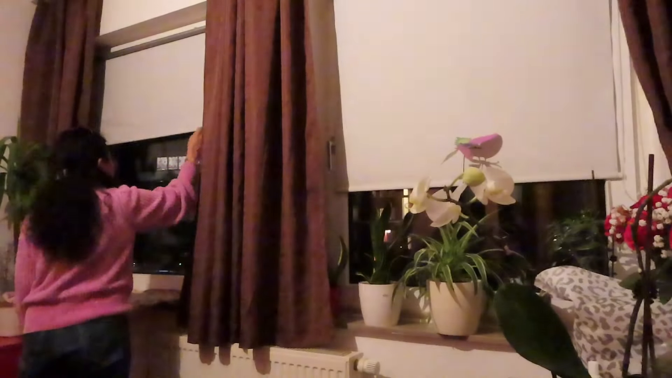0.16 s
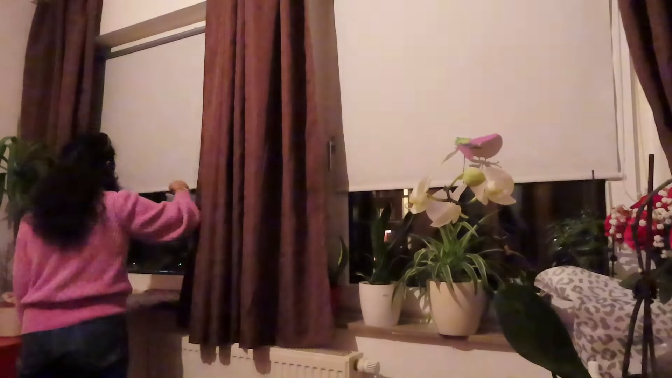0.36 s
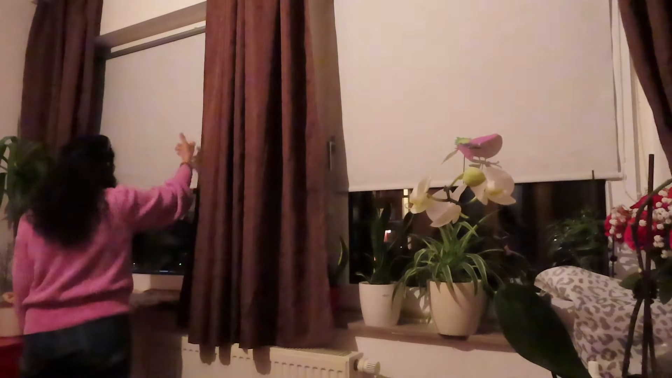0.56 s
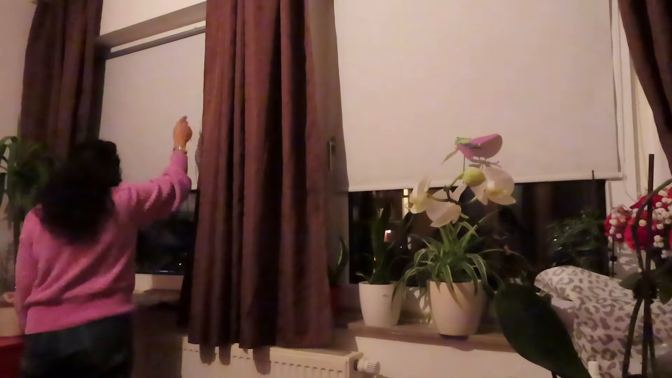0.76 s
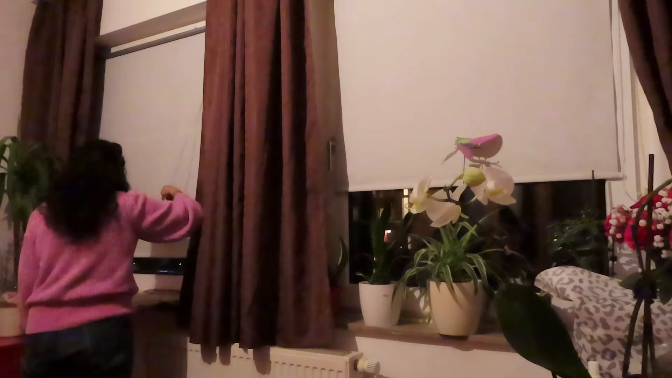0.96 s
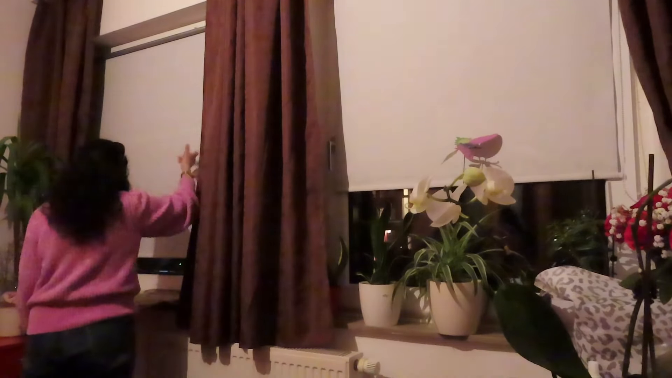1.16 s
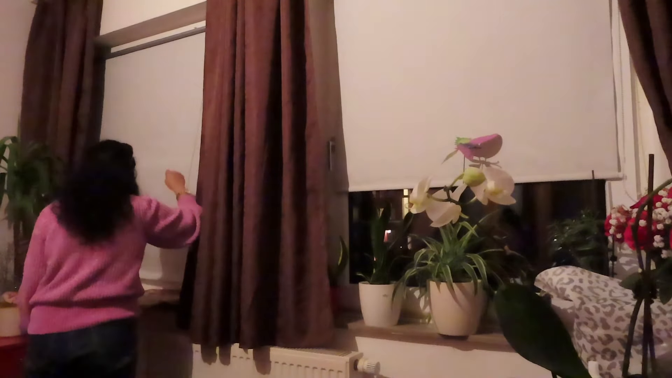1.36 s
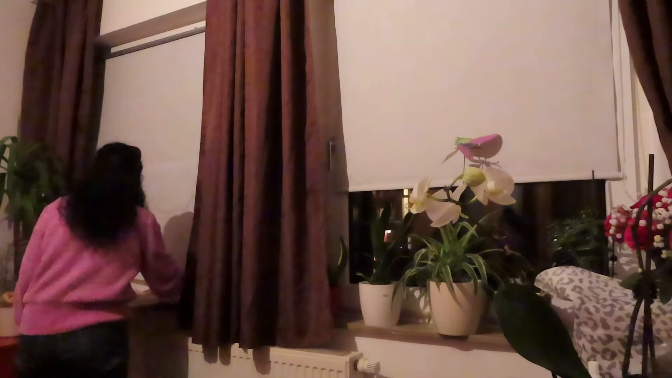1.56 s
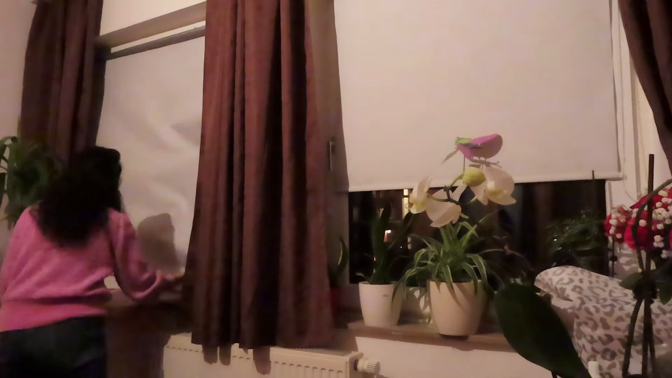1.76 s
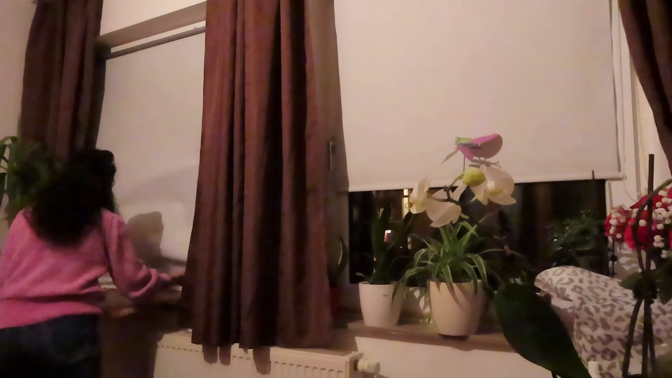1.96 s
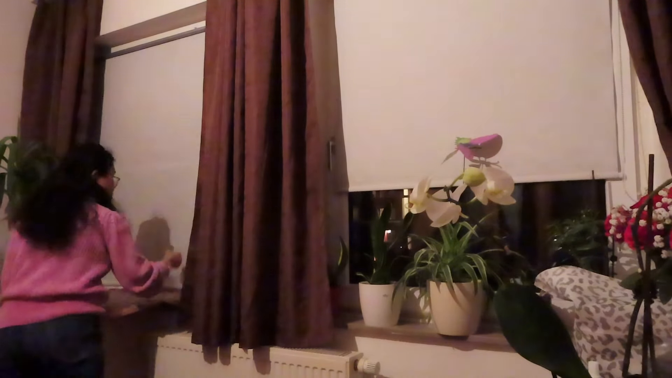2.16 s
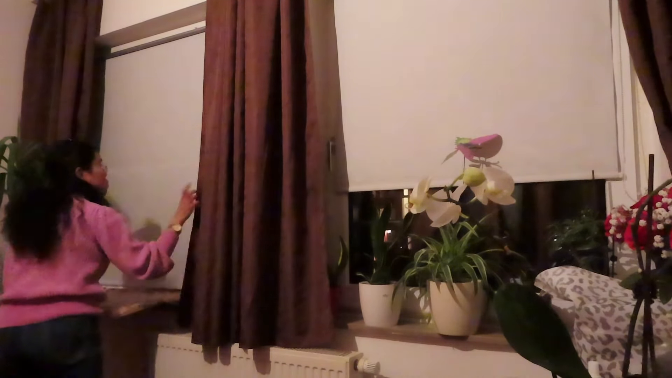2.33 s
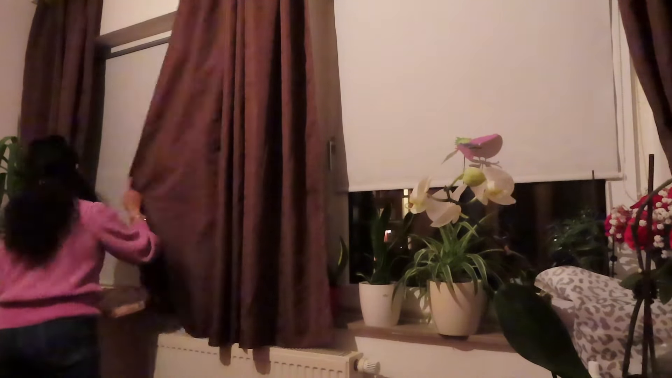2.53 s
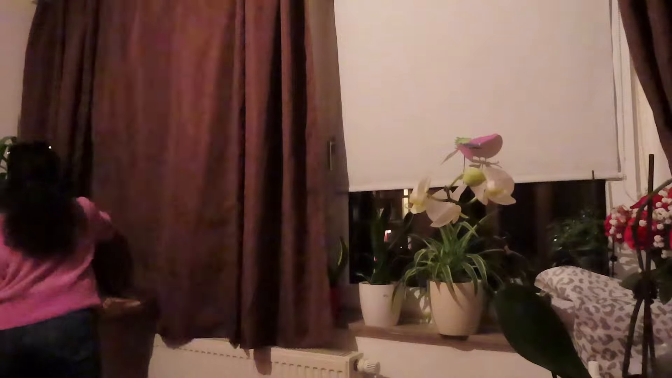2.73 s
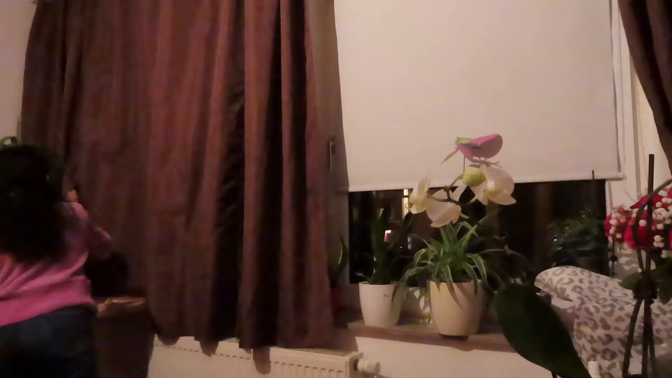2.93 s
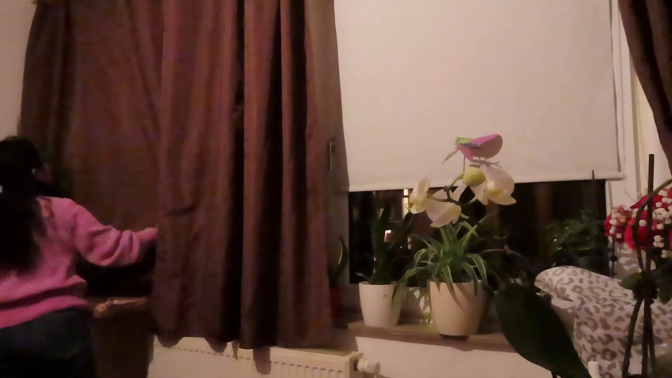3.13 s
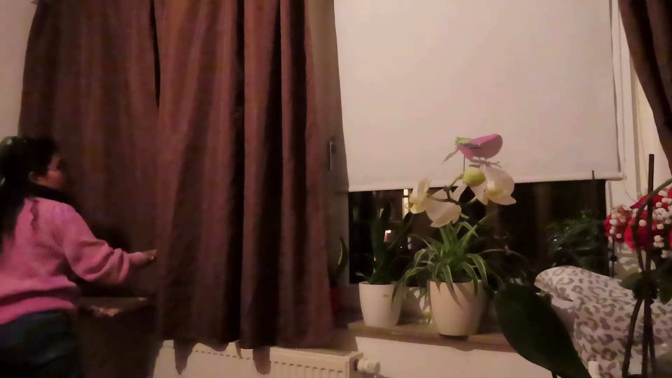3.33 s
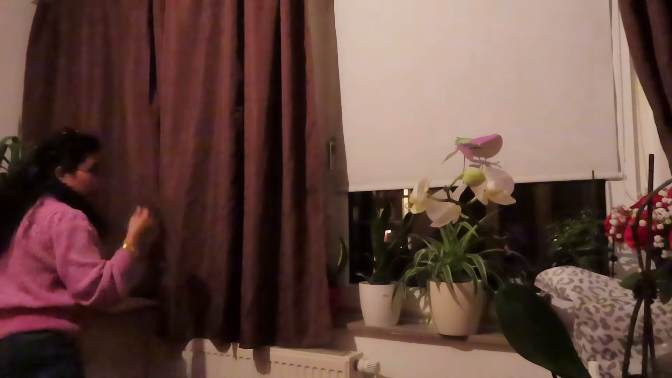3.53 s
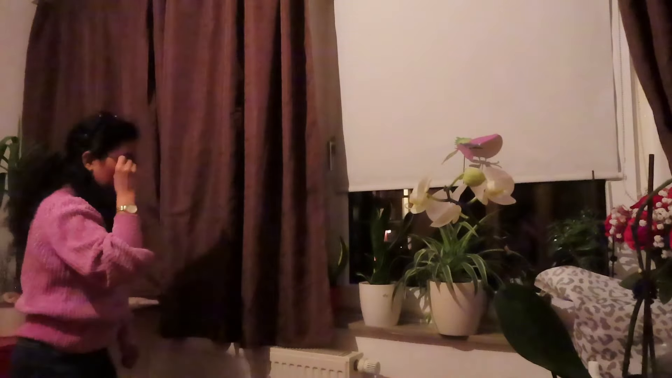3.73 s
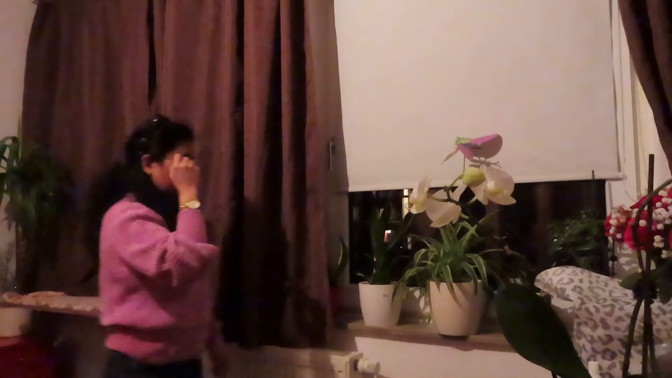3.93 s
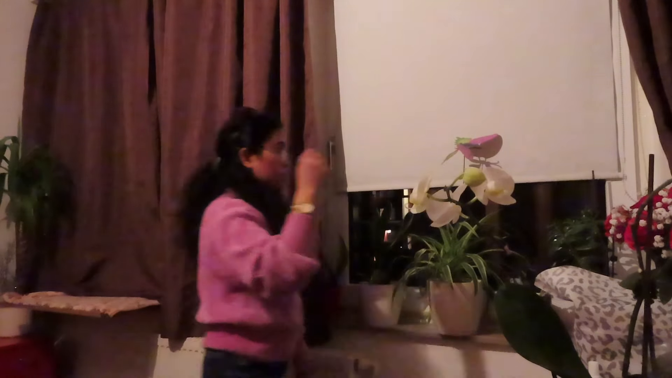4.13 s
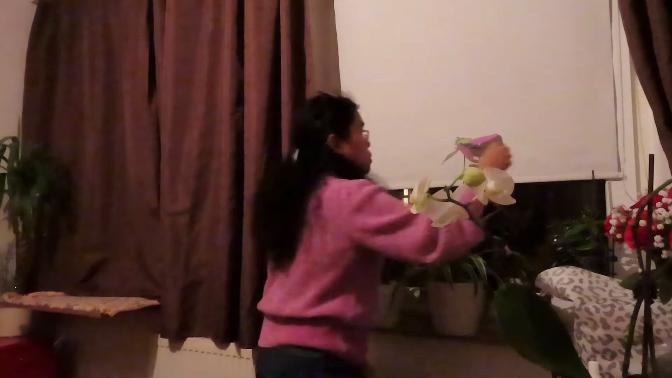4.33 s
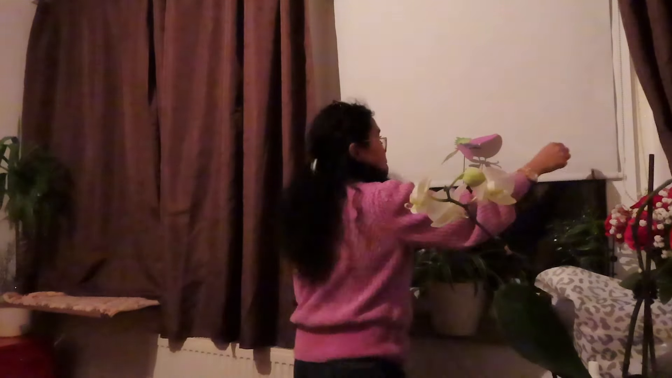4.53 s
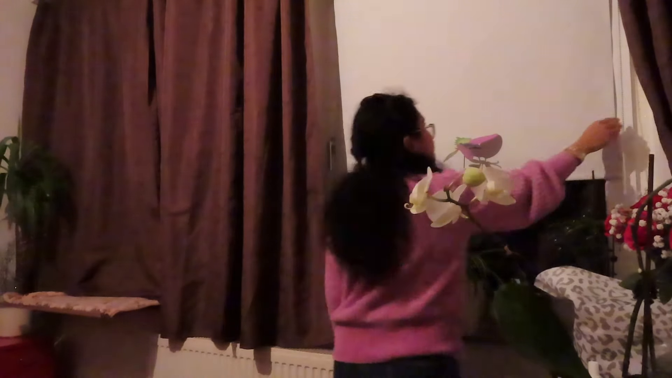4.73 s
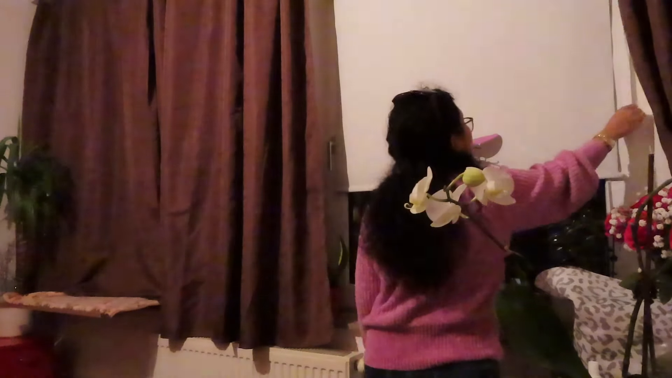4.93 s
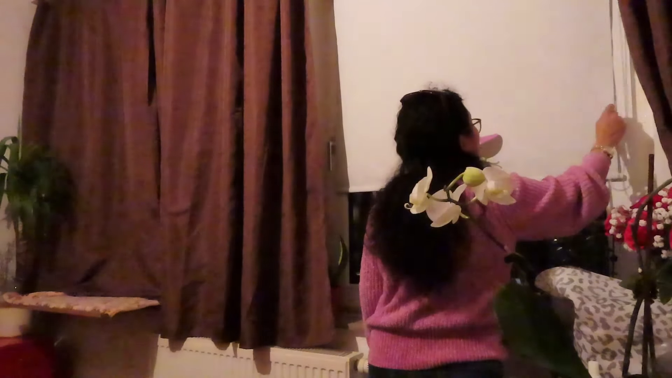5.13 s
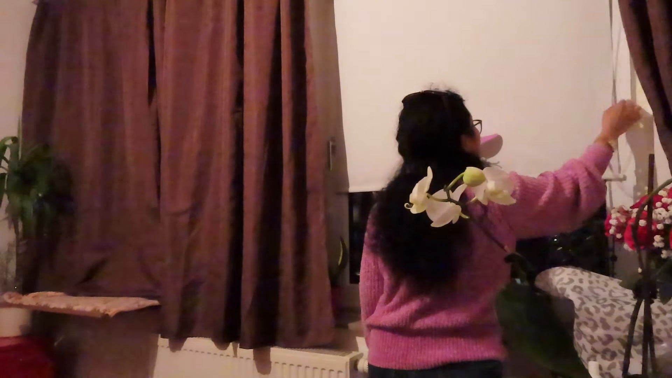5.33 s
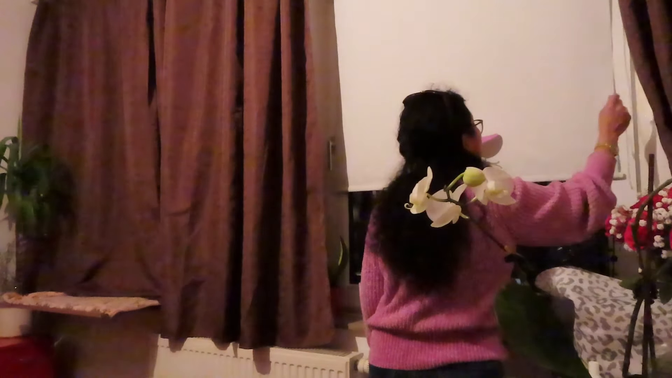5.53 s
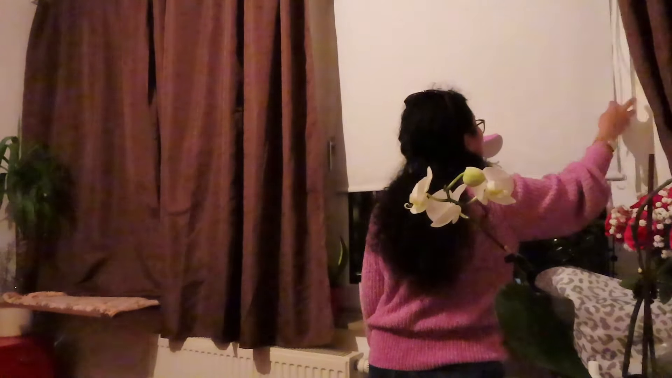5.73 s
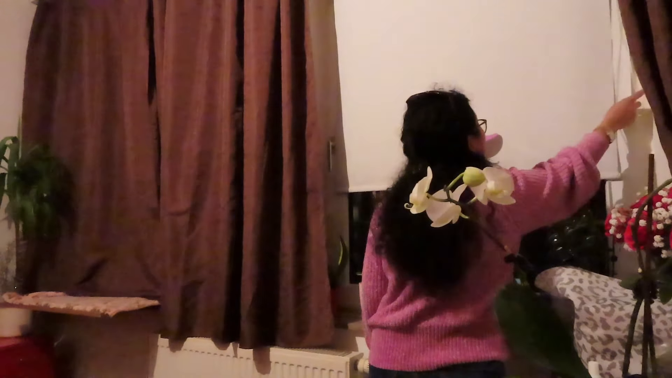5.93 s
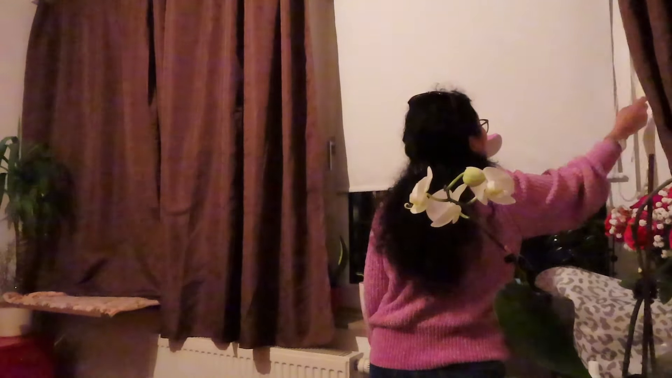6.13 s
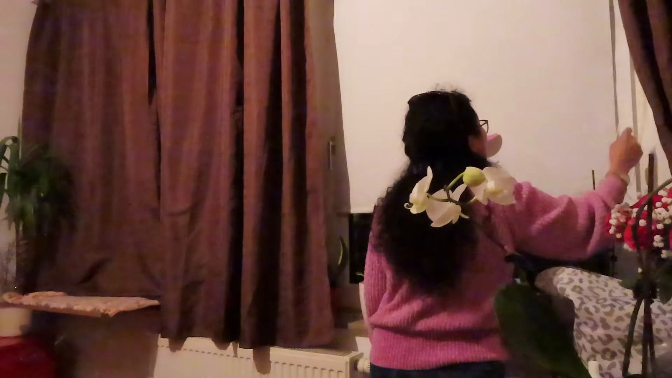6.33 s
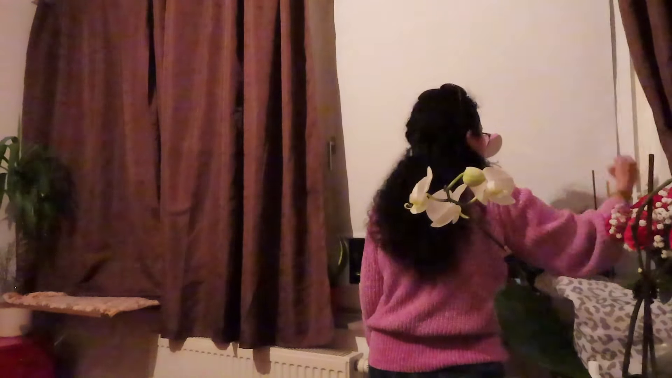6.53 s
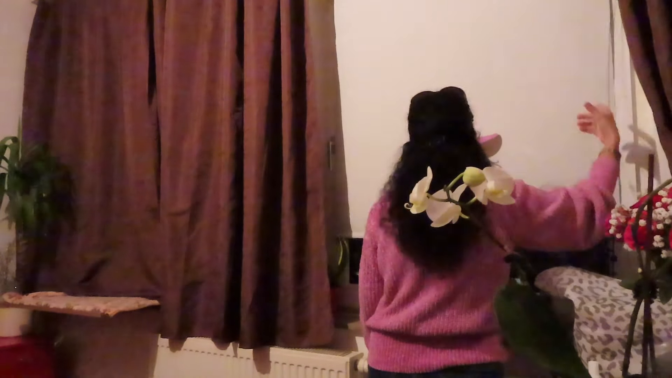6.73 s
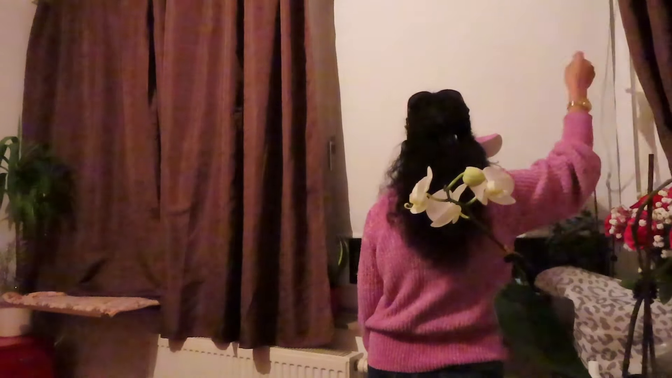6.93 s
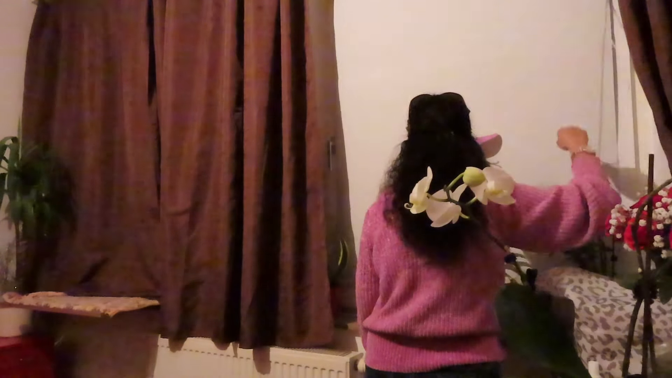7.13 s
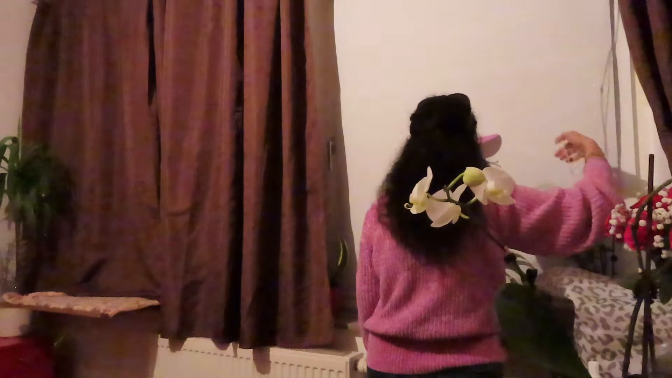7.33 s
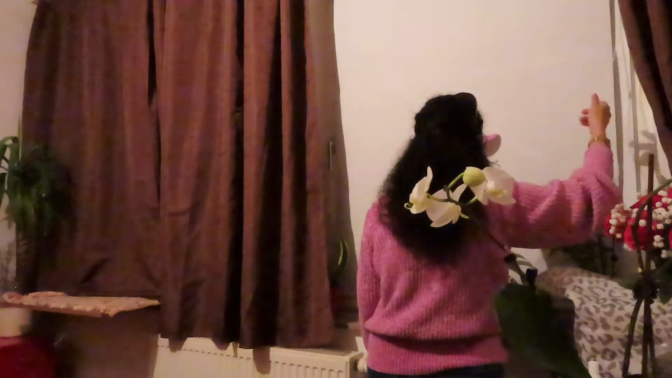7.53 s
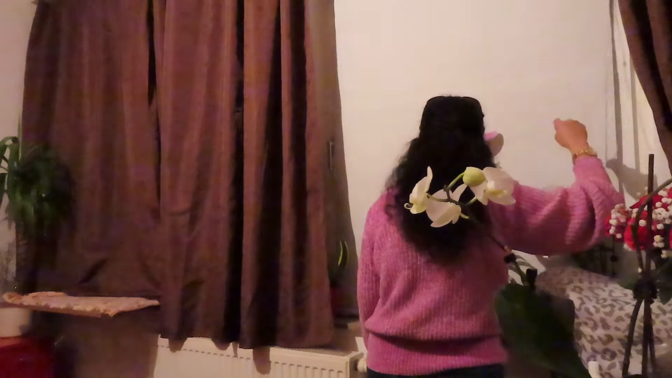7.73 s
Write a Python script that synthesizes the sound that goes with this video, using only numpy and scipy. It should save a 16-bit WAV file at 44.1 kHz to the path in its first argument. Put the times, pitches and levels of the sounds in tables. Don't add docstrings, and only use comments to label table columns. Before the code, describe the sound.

Quiet living room, soft steady hiss, short damped reflections, microphone a few metres off. At left, a bead chain rattles grittily over its sprocket at 0.2-0.4 s and again at 0.8-1.0, ringing the tube. A clattering tap comes at 1.24, a third softer pull with a dry snap at 1.37, chain clatter at 1.6-1.8, then the bottom bar lands with the sharpest clack at 1.81, tiny bounces and cloth rustle. From 2.54 to 2.9 curtain hooks scrape brightly along a rail; a second burst peaks near 3.15, rumbling lower. Near silence with faint steps follows until a deep, loud heel thump at 4.66. At right, light ticks run from 5.1 to 6.1, with a tiny creak at 5.56. Sparse chain tugs at 6.25-6.5 bring thin 12 kHz squeaks; a longer pull at 7.0-7.3 adds chirps and thuds, and quick tugs with a hard knock and squeak end it at 7.65-7.8.

```python
import sys
import numpy as np
from scipy import signal
from scipy.fft import rfft, irfft, next_fast_len
from scipy.io import wavfile
from scipy.ndimage import uniform_filter1d

SR = 44100
rng = np.random.default_rng(int(sys.argv[2]) if len(sys.argv) > 2 else 0)


def dump(signal):
    limited = np.clip(np.atleast_2d(signal).T, -1, 1)
    pcm = np.round(limited * 32767).astype(np.int16)
    wavfile.write(sys.argv[1], SR, pcm)


def convert_level_to_amplitude(level_db):
    exponent = np.asarray(level_db, float) / 20
    return 10 ** exponent


N = 343098
SIZE = next_fast_len(N)
HZ = np.fft.rfftfreq(SIZE, 1 / SR)


def evened(x):
    return x / np.sqrt(np.mean(x ** 2) + 1e-20)


def read(points, hz):
    f, value = np.transpose(points)
    return np.interp(np.log(hz + 1), np.log(f + 1), value)


def add(mix, s, sound):
    part = mix[round(s * SR):][:len(sound)]
    part += sound[:len(part)]


def side_of(s):
    return 0 if s < 4 else 1


def colour(x, points):
    gain_db = np.maximum(read(points, abs(np.fft.fftfreq(4096, 1 / SR))), -90)
    log_gain = np.log(convert_level_to_amplitude(gain_db))
    taps = np.fft.ifft(np.exp(np.conj(signal.hilbert(log_gain)))).real[:2048]
    return signal.oaconvolve(x, taps)[:len(x)]


def band(x, lo_hz, hi_hz):
    sos = signal.butter(2, [lo_hz, min(hi_hz, 20000)], "band", fs=SR, output="sos")
    return signal.sosfilt(sos, x)


def drift(n, seconds):
    size = max(int(seconds * SR), 1)
    once = uniform_filter1d(rng.standard_normal(n), size)
    return evened(uniform_filter1d(once, size))


def patchy(x, patch_db, frames=5, bins=4, turn=0):
    z = signal.stft(x, nperseg=256)[2]
    over_time = uniform_filter1d(rng.standard_normal(z.shape[::-1]), frames, 0)
    field = evened(uniform_filter1d(over_time, bins, 1)).T
    return signal.istft(z * convert_level_to_amplitude(patch_db * field) * np.exp(1j * turn * field), nperseg=256)[1][:N]


def grit(per_s, spread_db, smooth, flutter_db, flutter_s):
    size = convert_level_to_amplitude(spread_db * np.minimum(rng.exponential(1, N), 5)) * rng.choice([-1., 1.], N)
    clicks = evened(size * (rng.random(N) < per_s / SR))
    return (clicks + smooth * rng.standard_normal(N)) * convert_level_to_amplitude(flutter_db * drift(N, flutter_s))


def pair(a, b, same, lead):
    likeness = np.clip(read(same, HZ), -1, 1)
    half_turn = np.exp(.5j * read(lead, HZ))
    shared = rfft(a, SIZE) * np.sqrt((1 + likeness) / 2)
    own = rfft(b, SIZE) * np.sqrt((1 - likeness) / 2)
    return irfft(np.array([(shared + own) * half_turn, (shared - own) / half_turn]), SIZE)[:, :N]


# pitch_hz, density_db (per Hz)
HISS_COLOUR = [(12, -42), (20, -44), (38, -4), (68, -2.5), (119, -2.5), (373, -4), (567, -12.5), (815, -9),
               (1200, -14), (1380, -15.5), (1830, -17), (2850, -21), (6970, -30), (12900, -41.5),
               (15600, -53)]
# pitch_hz, likeness (-1 to 1)
HISS_SAME = [(60, 1), (150, 0.54), (350, -0.5), (700, 0.056), (1500, 0.017), (3000, -0.00071), (9000, 0.77),
             (12000, 0.5), (14000, 0.6)]


def hiss():
    a, b = (evened(colour(v, HISS_COLOUR)) for v in rng.standard_normal((2, N)))
    level_db = -50.5 + 0.55 * drift(N, 0.025)
    return convert_level_to_amplitude(level_db) * pair(a, b, HISS_SAME, [(0, 0)])


# pitch_hz, t60_s
ROOM_DECAY = [(125, 0.42), (1000, 0.16), (4000, 0.12), (12000, 0.05)]


def in_room(x, same, lead, wet_db):
    taps = np.zeros((2, SR // 2))
    at = np.arange(100, SR // 2 - 20, 20) + rng.integers(0, 20, (2, (SR // 2 - 101) // 20))
    np.put_along_axis(taps, at, rng.choice([-1., 1.], at.shape), 1)
    hz, t, z = signal.stft(taps, SR, nperseg=256)
    tail = signal.istft(z * convert_level_to_amplitude(-60 * t / read(ROOM_DECAY, hz)[:, None]), SR, nperseg=256)[1]
    tail = tail / np.linalg.norm(tail[0])
    wet = convert_level_to_amplitude(wet_db) * signal.oaconvolve(x[None], tail, axes=1)[:, :N]
    scatter = patchy(x, 0, 14, 3, turn=2.6)
    return pair(x + wet[0], scatter + wet[1], same, lead)


# peak_s, half_length_s, level_db
RUSTLES = [(1.828, 0.073, -35), (1.995, 0.076, -48), (2.71, 0.22, -41), (3.102, 0.23, -43.5),
           (5.315, 0.2, -65), (6.389, 0.14, -47), (7.156, 0.061, -37), (7.779, 0.061, -46),
           (3.701, 0.69, -63), (5.526, .025, -52), (5.111, .04, -50), (5.236, .03, -52), (2.051, .05, -47),
           (3.601, .03, -54), (2.576, .03, -46), (3.04, .05, -44), (2.84, .035, -46), (3.36, .045, -49),
           (1.9, .03, -47)]
# pitch_hz, density_db (per Hz)
CLOTH = [(120, -41.5), (200, -7.5), (304, -3.5), (371, -14.5), (454, -5.5), (3070, -10), (9660, -27),
         (15500, -26.5)]


def rustle():
    t = np.arange(N) / SR
    moves = sum(convert_level_to_amplitude(db) * np.exp(-((t - s) / half) ** 2) for s, half, db in RUSTLES)
    return 0.54 * (convert_level_to_amplitude(-57) + moves) * evened(colour(grit(3000, 1.7, 1.0, 2.2, 0.021), CLOTH))


def struck(s, db, modes, push_s, rise):
    t = np.arange(9000) / SR
    ring = sum(convert_level_to_amplitude(d - 60 * t / t60) * np.cos(2 * np.pi * hz * t) for hz, d, t60 in modes)
    push = signal.windows.hann(round(push_s * SR) + 2)
    ring = np.convolve(ring * (1 - np.exp(-t / rise)) ** 2, push)
    return s, convert_level_to_amplitude(db) * ring / abs(ring).max()


# pitch_hz, level_db, t60_s
FLOORBOARD = [(300, -19, .04), (386, -13, .032), (520, -19, .054), (752, -26, .067)]
# pitch_hz, level_db, delay_s, length_s
JOIST = (158, -22.5, .022, .052)


def thump(s, db):
    t = np.arange(9000) / SR
    u = np.maximum(t - .002, 0) / .0078
    blow = np.cos(2 * np.pi * 143 * (t - .0082)) * (u * np.exp(1 - u)) ** 2
    hum = sum(convert_level_to_amplitude(d - 60 * t / t60) * np.sin(2 * np.pi * hz * t) for hz, d, t60 in FLOORBOARD)
    hz, d, late, length = JOIST
    answer_shape = np.sin(np.pi * np.clip((t - late) / length, 0, 1) ** .55)
    blow += convert_level_to_amplitude(d) * np.sin(2 * np.pi * hz * t) * answer_shape
    return s, convert_level_to_amplitude(db) * (blow + hum * (1 - np.exp(-t / 0.0017)))


# start_s, peak_db, pitch_hz, t60_s
SWAYS = [
    (.002, -41.5, 58, 0.17),
    (.8, -44.5, 70, .15),
    (2.56, -44, 100, .15),
    (2.66, -44, 65, 0.13),
    (4.17, -44, 65, .12),
    (5.1, -46, 85, .2),
    (7.19, -40, 52, .2),
]
# start_s, peak_db
THUMPS = [
    (0.009, -47),
    (1.876, -34),
    (2.001, -44),
    (3.971, -47.5),
    (4.177, -43),
    (4.566, -40),
    (7.207, -37),
    (6.29, -43),
]
# start_s, peak_db
HEEL = (4.6595, -9.2)


def floor_moves():
    floor = np.zeros(N)
    for s, db, hz, t60 in SWAYS:
        add(floor, *struck(s, db, [(hz, 0, t60)], .004, 0.01))
    for row in THUMPS + [HEEL]:
        add(floor, *thump(*row))
    return floor


def tap(s, db, hz, t60, bright_db, knock_db=-60, rise=.0006, octaves=.8):
    t = np.arange(4500) / SR
    size = rng.standard_normal((3, len(t))) * convert_level_to_amplitude(3.0 * np.minimum(rng.exponential(1, len(t)), 2.5))
    chatter = 0.11 * rng.standard_normal(50) * (rng.random(50) < .12) + (np.arange(50) == 0)

    def blow(slow):
        return (1 - np.exp(-t / rise)) ** 3 * convert_level_to_amplitude(-60 * t / (slow * max(t60, .005)))

    bounced = np.convolve(size[0], chatter)[:len(t)]
    clatter = evened(band(bounced, hz / 2 ** octaves, hz * 2 ** octaves)) * blow(0.8)
    bright = evened(band(size[1], 5900, 14600)) * convert_level_to_amplitude(bright_db) * blow(0.65)
    knock = evened(band(size[2], 66, 760)) * convert_level_to_amplitude(knock_db) * blow(1.0)
    return s - .6 * rise, 0.36 * convert_level_to_amplitude(db) / blow(0.94).max() * (clatter + bright + knock)


# start_s, peak_db, centre_hz, t60_s
CLATTERS = [(.55, -40.5, 1900, .1), (.609, -43, 1890, 0.11), (.784, -46, 1240, .062),
            (.816, -25.5, 2700, 0.02), (1.62, -32.5, 1520, 0.048), (1.652, -39, 1330, 0.088),
            (1.69, -30, 2840, 0.096), (1.691, -31, 6800, 0.079), (1.761, -24.5, 3240, 0.087),
            (2.268, -37.5, 2200, 0.048), (2.41, -39.5, 1360, 0.041), (7.085, -30, 1220, .19),
            (7.736, -20.5, 1030, 0.12)]
# start_s, peak_db, centre_hz, t60_s
BUMPS = [(1.181, -37.5, 1500, 0.085), (1.241, -18.5, 2050, 0.11), (1.807, -13.5, 1660, 0.065),
         (1.355, -25, 800, 0.28), (1.934, -33, 955, 0.12), (1.949, -31, 880, 0.035),
         (2.943, -30, 1890, 0.067), (5.316, -36, 1300, 0.037), (5.446, -41, 2000, 0.066),
         (5.705, -43.5, 991, .08)]
# start_s, peak_db, centre_hz, t60_s
KNOCKS = [(.209, -39, 1800, 0.075), (2.049, -48, 1720, .072), (5.08, -41, 1940, 0.071),
          (6.263, -28.5, 1800, 0.047), (6.468, -34, 1120, 0.064), (7.684, -25, 1150, 0.12)]
# start_s, peak_db, centre_hz, t60_s
THUDS = [(1.874, -24, 950, 0.075), (2.971, -32, 2200, 0.061), (5.104, -45.5, 1790, 0.078),
         (7.036, -26.5, 1510, 0.04), (7.195, -23.5, 1020, 0.032)]
# start_s, peak_db, centre_hz, t60_s
SLAPS = [
    (4.659, -29.5, 700, .075),
    (4.66, -34.5, 2100, 0.075),
    (4.685, -42, 700, .07),
    (4.775, -45, 600, .12),
]
# start_s, peak_db, centre_hz, t60_s, bright_db (relative)
TICKS = [(0.2318, -37, 1790, 0.12, 3), (0.579, -54, 1240, 0.057, 11.5), (2.5438, -27, 2400, .09, -11),
         (5.2097, -34.5, 1400, 0.029, 3.5), (5.344, -48, 3000, .04, -3), (5.4894, -44, 1320, 0.24, -8),
         (5.5477, -32, 2600, 0.024, -3), (5.8482, -31, 2900, 0.11, -11), (5.952, -39, 1260, 0.036, -2),
         (5.982, -41, 2250, 0.13, 1.5), (6.0643, -42.5, 1890, 0.04, 0.5), (6.227, -35.5, 2820, 0.022, 0),
         (6.2956, -35, 2000, 0.019, 0), (6.5283, -42.5, 1900, 0.04, 7), (6.5764, -49, 1420, 0.044, 3),
         (6.9194, -52, 1310, 0.04, -8), (6.9643, -54, 1970, 0.061, 13.5), (6.9908, -36, 2600, 0.03, -1),
         (7.148, -24.5, 1210, 0.04, -2), (7.306, -31.5, 3020, 0.054, -3), (1.368, -17, 900, 0.053, -24),
         (3.011, -22, 2200, .1, -9), (7.7115, -15, 1300, 0.03, -22), (2.812, -39, 3500, .03, -5),
         (5.32, -38, 2000, .03, -13), (6.282, -41, 2000, .02, 0), (6.388, -37, 2500, .02, 6),
         (6.397, -32, 2200, .025, -18), (6.482, -31, 1600, 0.032, -8), (6.873, -53, 2000, .05, 5),
         (7.067, -36, 2000, .02, 8), (7.0841, -24, 1800, 0.026, -14), (7.115, -31, 2200, .03, -14),
         (7.133, -32, 2000, .02, 8), (7.216, -38, 2500, .03, 1)]


def taps():
    sides = np.zeros((2, N))
    kinds = [(CLATTERS, -11, -21), (BUMPS, -17, -33), (KNOCKS, -8.5, -4.5), (THUDS, -18, -1.7), (SLAPS, -47, 0)]
    for rows, bright_db, knock_db in kinds:
        for row in rows:
            add(sides[side_of(row[0])], *tap(*row, bright_db, knock_db, rise=.0045, octaves=0.82))
    for row in TICKS:
        add(sides[side_of(row[0])], *tap(*row, octaves=1.14))
    return sides


# start_s, peak_db, pitch_hz, t60_s
PINGS = [(1.244, -30, 960, 0.073), (1.243, -30, 2013, 0.09), (1.243, -27, 2810, 0.049),
         (1.245, -32.5, 3240, .08), (1.244, -45, 5152, .06), (1.244, -42, 6035, .07),
         (2.544, -41, 4170, .04), (2.544, -51, 7150, .03), (2.544, -45, 8300, 0.028),
         (2.549, -36.5, 228, 0.023), (5.211, -45, 1400, 0.026), (5.318, -41, 1394, 0.028),
         (1.811, -26, 763, 0.065), (1.877, -31.5, 800, .05), (5.849, -42, 867, .03),
         (5.849, -42, 4673, .02), (5.849, -44, 6228, .018), (5.85, -48, 3257, .04),
         (7.688, -33, 5000, .025), (7.686, -31, 12600, .03), (1.766, -37, 5800, .04),
         (1.695, -41, 6700, .04), (1.811, -36, 8300, .03), (1.695, -40, 1150, .05), (7.035, -34, 1950, .05),
         (7.172, -34, 1100, .05), (7.746, -30, 3300, .03), (5.553, -42, 2800, .02),
         (6.227, -38, 2950, .018), (6.293, -36, 2760, 0.045), (6.273, -38, 1900, .035),
         (6.482, -39, 1145, .04), (4.663, -46, 2400, .05), (1.392, -30, 1850, .04), (5.96, -45, 232, .1)]
# start_s, peak_db
SNAPS = [(1.3705, -18.5), (3.012, -28), (5.21, -40), (5.549, -35), (5.8495, -29.5), (6.471, -34),
         (7.712, -20.5), (.81, -33), (5.449, -45), (5.32, -43)]
# pitch_hz, level_db, t60_s
BEAD = [(1500, 0, .004), (3400, -4, .003), (8000, -11, .002)]
# start_s, peak_db
BAR_HITS = [
    (1.811, -7),
    (1.8149, -19),
    (1.8175, -16),
    (1.8217, -20),
]
# pitch_hz, level_db, t60_s
BAR = [(542, -17, 0.053), (1300, 10.5, 0.0047), (2200, 18, 0.0027), (3100, -28, 0.0094), (5050, -25, .01)]


def ringing_parts():
    sides = np.zeros((2, N))
    for s, db, hz, t60 in PINGS:
        add(sides[side_of(s)], *struck(s, db, [(hz, 0, t60)], .0001, .0018))
    for row in SNAPS:
        add(sides[side_of(row[0])], *struck(*row, BEAD, .00005, .0001))
    for row in BAR_HITS:
        add(sides[0], *struck(*row, BAR, 0.00013, 0.00051))
    return sides


def swell(s, rise, fall, hz, db, climb_hz=0, sag_hz=0):
    shoulder_db = db - 6.5
    return [(s - rise, hz - climb_hz, db - 28),
            (s - 0.67 * rise, hz - 0.52 * climb_hz, shoulder_db),
            (s, hz, db),
            (s + .6 * fall, hz - .6 * sag_hz, shoulder_db),
            (s + fall, hz - sag_hz, db - 21)]


def squeak(rows, waver_hz=90, throb_db=3.5, overtones_db=()):
    s, hz, db = np.transpose(rows)
    t = np.arange(s[0], s[-1], 1 / SR)
    turns = np.cumsum(np.interp(t, s, hz) + waver_hz * drift(len(t), 0.00053)) / SR
    throb = convert_level_to_amplitude(np.interp(t, s, db) + throb_db * drift(len(t), 0.0026))
    partials_db = (0, *overtones_db)
    tone = sum(convert_level_to_amplitude(d) * np.sin(2 * np.pi * (k + 1) * turns) for k, d in enumerate(partials_db))
    return s[0], np.sqrt(2) * throb * tone * signal.windows.tukey(len(t), .15)


# peak_s, rise_s, fall_s, pitch_hz, level_db
CREAK = (5.564, .009, .014, 3090, -46.5)
# peak_s, rise_s, fall_s, pitch_hz, level_db
BAR_RING = (2.1, .03, .12, 692, -55.5)


def creaks():
    sides = np.zeros((2, N))
    add(sides[0], *squeak(swell(*BAR_RING), waver_hz=25, throb_db=4))
    add(sides[1], *squeak(swell(*CREAK), waver_hz=150, throb_db=2, overtones_db=(-16, -12)))
    return sides


# peak_s, rise_s, fall_s, pitch_hz, level_db
SQUEAKS = [(6.264, 0.022, 0.019, 12460, -33), (6.391, .02, 0.012, 12300, -30),
           (6.362, 0.019, .025, 12050, -36.5), (6.485, 0.026, 0.031, 12400, -28),
           (7.07, 0.013, .01, 12700, -35.5), (7.095, .025, 0.027, 12500, -43),
           (7.687, 0.034, 0.017, 12550, -28), (6.342, .01, .013, 12800, -46),
           (6.24, .012, .012, 12200, -48)]
# peak_s, length_s, pitch_hz, glide_hz, level_db
CHIRPS = [(6.332, 0.0059, 11500, 800, -39), (6.255, .018, 11500, -150, -47), (6.407, .008, 10000, -50, -48),
          (7.128, .016, 10000, -450, -43), (7.2, 0.012, 9900, 80, -47), (6.248, .01, 11800, -250, -46),
          (7.301, 0.034, 8451, -30, -55.5), (7.231, .01, 8500, 0, -35), (7.247, 0.015, 8490, 0, -33),
          (7.267, 0.017, 8450, -20, -29.5), (7.294, 0.023, 12200, -200, -38), (7.18, .01, 12500, 0, -49),
          (7.779, 0.012, 8470, 20, -32.5), (5.573, .012, 11850, 100, -57)]
# pitch_hz, lead_rad
WHISTLE_LEAD = [(8500, -1.05), (12000, -1.84)]


def roller_squeaks():
    whistle = np.zeros(N)
    for row in SQUEAKS:
        add(whistle, *squeak(swell(*row, climb_hz=350, sag_hz=30)))
    for s, length, hz, glide_hz, db in CHIRPS:
        add(whistle, *squeak(swell(s, length, length, hz, db, glide_hz, -glide_hz)))
    return pair(whistle, 0 * whistle, [(0, 0.69)], WHISTLE_LEAD)


def rattle(pulls, body, drive, rings=(), *, usual_db, top_db, top_growth, bottom_db, bottom_growth, load_db):
    rung, t = rfft(colour(drive, body), SIZE), np.arange(N) / SR
    since_start = t - pulls[0][0]
    song = 0
    for hz, width, db, change_db in rings:
        tone = evened(irfft(rung * np.exp(-((HZ - hz) / width) ** 2), SIZE))[:N]
        song = song + convert_level_to_amplitude(db + change_db * np.clip(since_start, 0, 1)) * tone
    low = 1 / (1 + (HZ / 600) ** 4)
    high = 1 / (1 + (5400 / (HZ + 1)) ** 6)
    middle, top, bottom = (evened(irfft(rung * share, SIZE))[:N] for share in (1 - low - high, high, low))
    speed = sum(convert_level_to_amplitude(db - usual_db) * np.interp(t - s, np.cumsum([0, up, steady, down]), [0, 1, 1, 0])
                for s, up, steady, down, db in pulls)
    mix = speed * middle
    mix += convert_level_to_amplitude(top_db) * speed ** top_growth * top
    mix += convert_level_to_amplitude(bottom_db + load_db * since_start) * speed ** bottom_growth * bottom
    return convert_level_to_amplitude(usual_db) * (mix + convert_level_to_amplitude(-6.0) * speed ** 2.4 * song)


# start_s, speed_up_s, steady_s, slow_down_s, level_db (at full speed)
FAR_PULLS = [
    (6.24, 0.037, 0.031, 0.032, -41),
    (6.3, 0.067, .15, 0.03, -45.5),
    (6.99, 0.048, 0.16, 0.046, -37),
    (7.19, 0.048, 0.055, 0.04, -47),
    (7.63, 0.07, 0.0057, 0.073, -34.5),
    (7.72, 0.029, .05, .02, -39),
]
# pitch_hz, density_db (per Hz)
FAR_BODY = [(30, -7), (150, 0.5), (300, -1), (520, -13.5), (700, -9), (1090, -4), (1500, -7), (2400, -7.5),
            (3300, -11), (4700, -18), (6500, -17), (10000, -9.5), (13500, -15), (15500, -20.5)]


def far_blind():
    beads = patchy(grit(1200, 2.2, 0.79, 1.6, 0.0036), 3.0)
    return rattle(FAR_PULLS, FAR_BODY, beads, usual_db=-42.5, top_db=-10.5, top_growth=0.5,
                  bottom_db=0, bottom_growth=0.87, load_db=-3.5)


# start_s, speed_up_s, steady_s, slow_down_s, level_db (at full speed)
SLIDES = [
    (2.535, 0.1, 0.11, 0.12, -30),
    (2.61, 0.059, 0.043, 0.046, -33),
    (2.88, 0.16, 0.047, 0.31, -36),
    (3.095, 0.044, 0.043, 0.077, -27.5),
]
# pitch_hz, density_db (per Hz)
RAIL_BODY = [(30, -34), (130, -7), (400, -19), (800, -4), (1300, -2), (2100, 3.5), (2600, 0.5), (3600, -3),
             (4500, -7.5), (5400, -9.5), (6300, -11), (9200, -7), (12500, -9), (15500, -30)]
# pitch_hz, width_hz, level_db, change_db (per s)
GLIDERS = [(4650, 360, 1, -26), (5140, 1500, -22.5, 23), (2720, 220, -26, 20)]


def curtain():
    hooks = patchy(grit(4000, 1.6, 1.3, 0.61, 0.0037), 1.7)
    return rattle(SLIDES, RAIL_BODY, hooks, GLIDERS, usual_db=-28.5, top_db=-15.5, top_growth=1.1,
                  bottom_db=-28, bottom_growth=0.8, load_db=24.5)


# start_s, speed_up_s, steady_s, slow_down_s, level_db (at full speed)
NEAR_PULLS = [
    (.205, 0.13, 0.017, 0.065, -33),
    (.785, 0.089, 0.071, 0.08, -32),
    (1.26, 0.044, 0.099, 0.064, -36.5),
]
# pitch_hz, density_db (per Hz)
NEAR_BODY = [(24, -6), (40, -3.5), (123, -8), (197, 4), (253, -9.5), (342, -2), (637, -15.5), (758, -5.5),
             (1350, -7), (1860, 0.5), (2600, -5.5), (3400, -3.5), (4920, -13.5), (11200, -15),
             (15500, -24.5)]
# pitch_hz, width_hz, level_db, change_db (per s)
TUBE = [(1860, 84, -17, 2)]


def near_blind():
    beads = patchy(grit(2500, 1.9, 0.76, 0.84, 0.0036), 2.4)
    return rattle(NEAR_PULLS, NEAR_BODY, beads, TUBE, usual_db=-34, top_db=-4.5, top_growth=1.32,
                  bottom_db=-8, bottom_growth=1, load_db=-1)


# pitch_hz, likeness (0 to 1)
LEFT_SAME = [(60, 0.93), (150, 1), (350, 0.9), (700, 1), (1500, 0.98), (3000, 0.9), (4500, 0.28),
             (7000, 0.15), (10000, 0.13), (12000, 0.46), (14000, 0.49)]
# pitch_hz, lead_rad
LEFT_LEAD = [(1500, 0), (3000, .12), (4500, .5), (8000, 1.2), (10000, 2.1), (12000, 2.3), (14000, 1.2)]
# pitch_hz, likeness (0 to 1)
RIGHT_SAME = [(60, .99), (150, 1), (350, 0.98), (700, 1), (1500, 1), (3000, 0.95), (4500, 0.5),
              (6000, 0.15), (10000, 0.31), (12000, .2), (14000, 0.6)]
# pitch_hz, lead_rad
RIGHT_LEAD = [(1500, 0), (3000, -.2), (4500, -.8), (8000, -.9), (10000, -.5), (12000, -1.8), (14000, -1.2)]


def scene():
    left, right = taps() + ringing_parts() + creaks()
    left = left + near_blind() + curtain() + rustle()
    right = right + far_blind()
    rooms = in_room(left, LEFT_SAME, LEFT_LEAD, -16.5) + in_room(right, RIGHT_SAME, RIGHT_LEAD, -13.0)
    return rooms + roller_squeaks() + floor_moves() + hiss()


def band_limit(x):
    return signal.sosfilt(signal.butter(12, 15720, fs=SR, output="sos"), x)


def record(dry):
    limit = np.clip((15800 - HZ) / 60, 0, 1)
    top_db = np.interp(HZ, [12500, 14000, 15000, 15800], [0, -2, -7, -11])
    mix = irfft(rfft(dry, SIZE) * limit * convert_level_to_amplitude(top_db), SIZE)[:, :N]
    return band_limit(mix)


dry = scene()
out = record(dry)
dump(out)
```